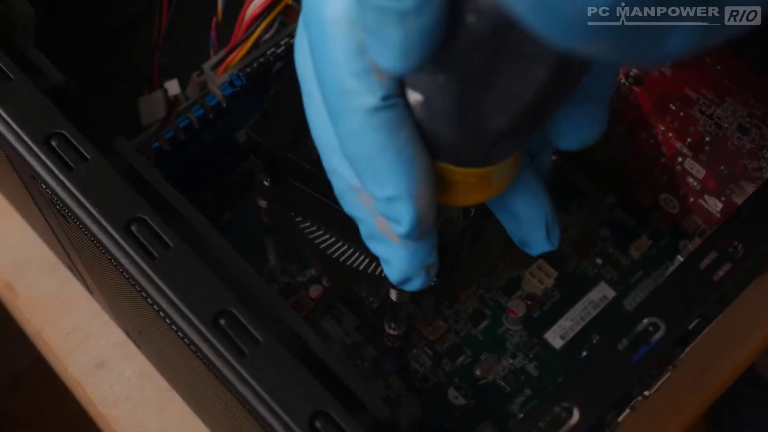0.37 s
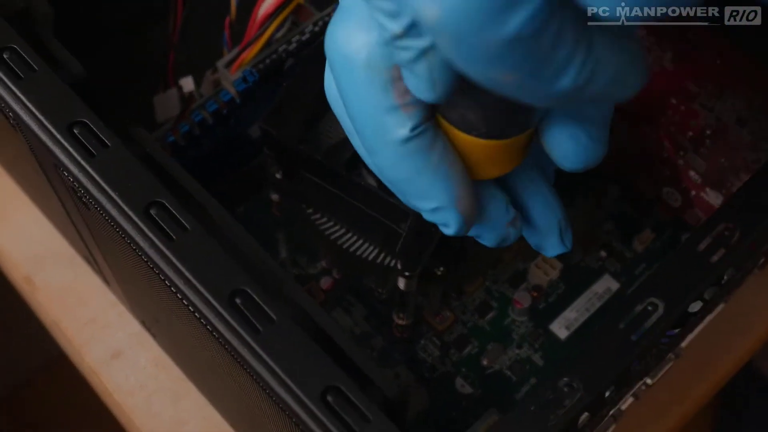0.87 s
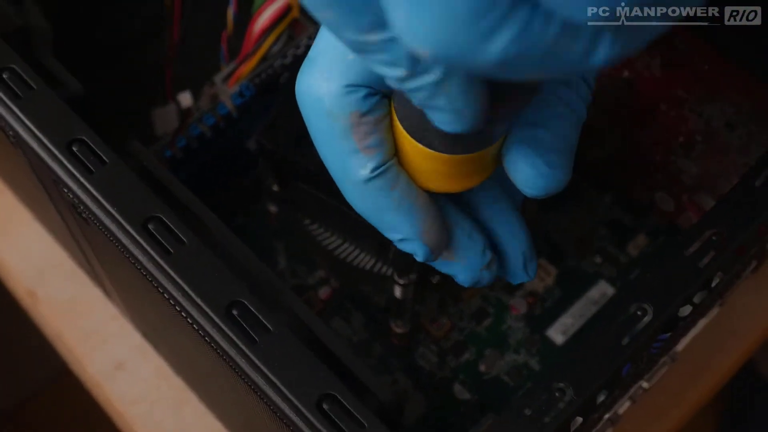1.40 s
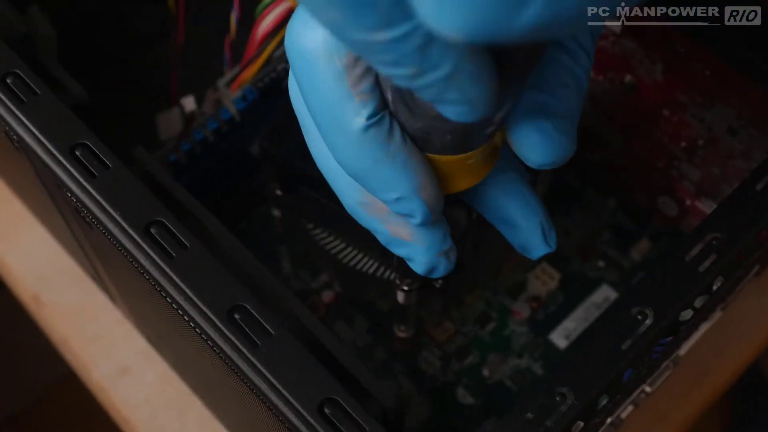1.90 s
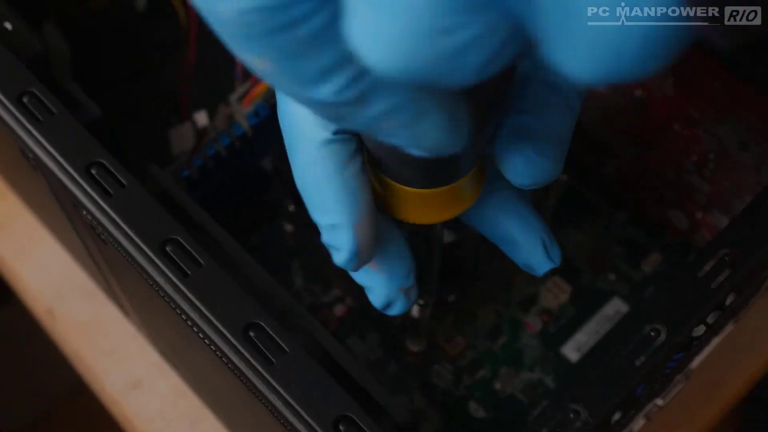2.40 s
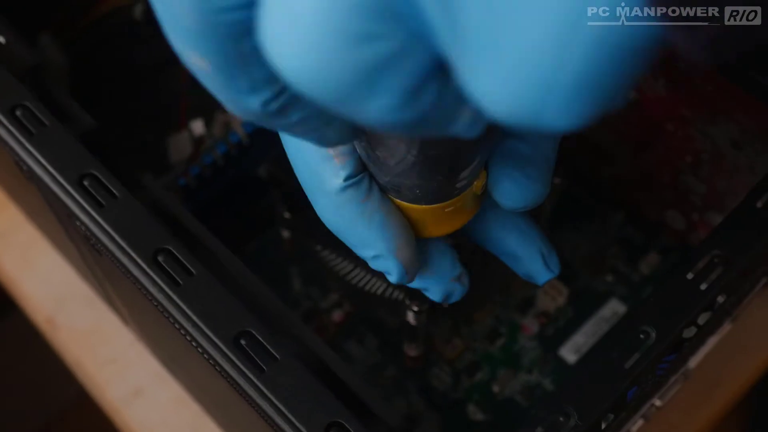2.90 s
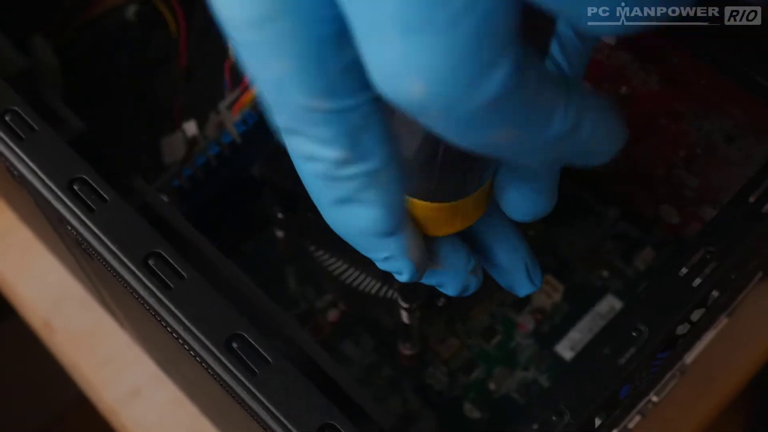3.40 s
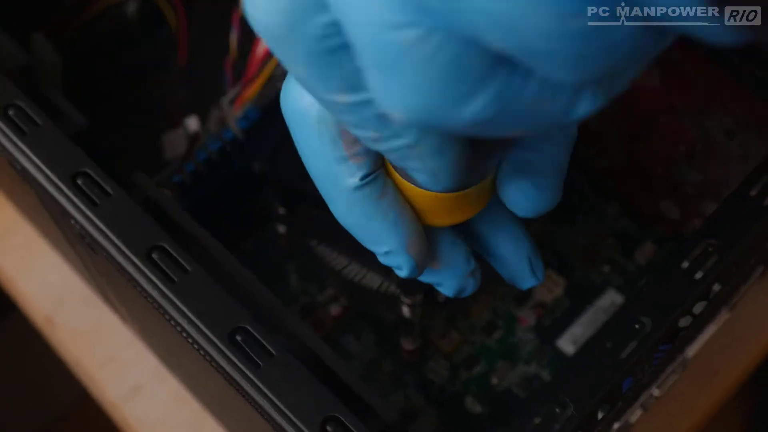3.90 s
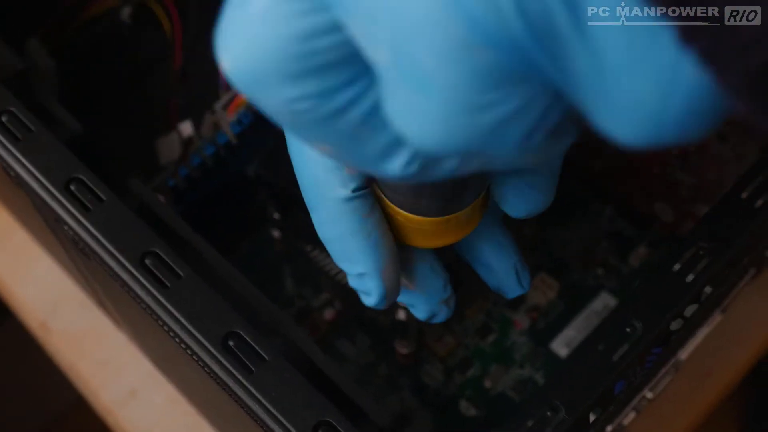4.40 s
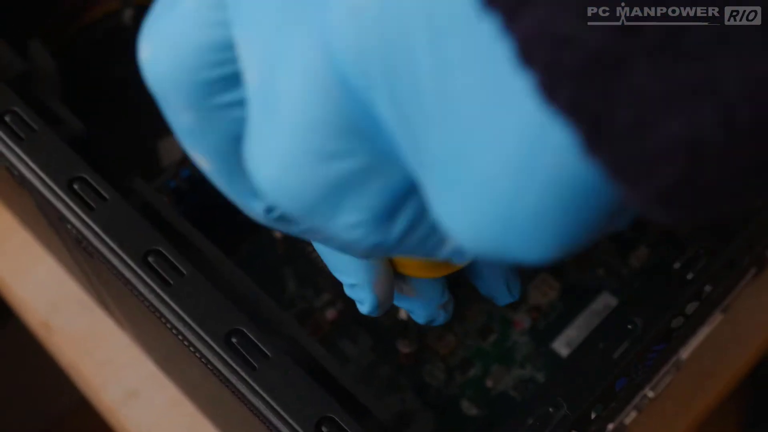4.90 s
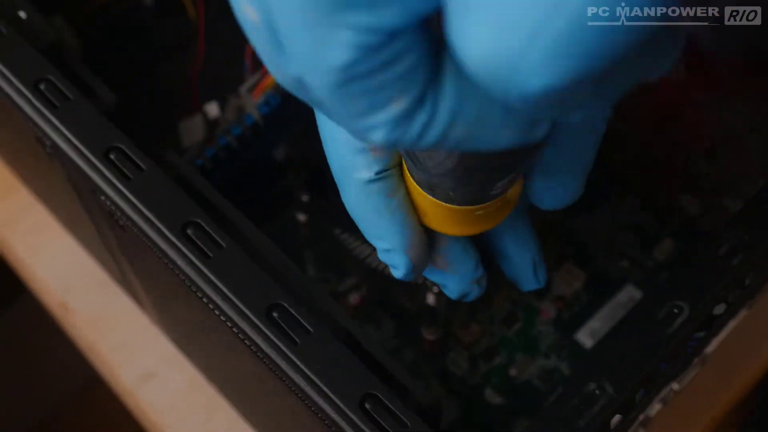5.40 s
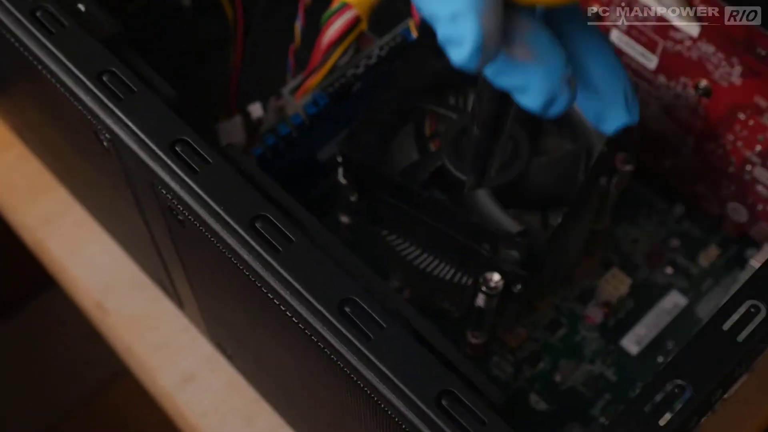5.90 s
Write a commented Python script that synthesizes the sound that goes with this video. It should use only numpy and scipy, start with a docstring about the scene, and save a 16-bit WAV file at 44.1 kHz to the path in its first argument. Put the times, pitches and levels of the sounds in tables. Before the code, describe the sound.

Gloved fingers rustle quickly around a screwdriver handle while small metal ticks, gritty scrapes and several hard, short clacks sound in a quiet room.

```python
"""A quiet room: gloved hands turn a screwdriver on a spring-loaded screw inside an open sheet-metal case.
The tip ticks and scrapes and the spring pings: clicks and grains set metal tones ringing.
Pushes thump by rocking the case panels; gloves rustle as swelling noise and once squeak as a gliding tone.
A low hum and a hiss lie below, and echoes of dying noise follow. Two microphones stand a little apart."""
import sys
import numpy as np
from scipy import signal
from scipy.io import wavfile

SR = 44100
rng = np.random.default_rng(int(sys.argv[2]) if len(sys.argv) > 2 else 0)


def makeup_ratio(level_db):
    """Linear amplitude ratio for a level in decibels (20 dB per factor of ten)."""
    decades = np.asarray(level_db, float) / 20
    return 10 ** decades


def inscribe(sig):
    """Save sig as 16-bit PCM at rate SR to the path in sys.argv[1].

    A 1-D sig is mono; a 2-D sig holds one channel per row.
    Samples are clipped to [-1, 1] before scaling.
    """
    pcm = np.round(np.clip(np.atleast_2d(sig).T, -1, 1) * 32767)
    wavfile.write(sys.argv[1], SR, pcm.astype(np.int16))


N = 266452   # length in samples

# ringing tones of the case panels: pitch_hz [Hz], level_db [relative dB], t60_s [s to fall by 60 dB]
CASE_MODES = [(134, 7, 0.19), (176, 3.5, 0.19), (231, 18.5, 0.053), (282.2, 5, 0.14), (319.5, -1, 0.31),
              (353.7, 8.5, 0.1), (401, 5, 0.087), (465, -10, 0.018), (557, -7.5, 0.017), (630, -26.5, 0.02),
              (930, -15.5, 0.02), (972, -13.5, 0.028), (1103, -6.5, 0.017), (1320, -6, 0.016),
              (1536, -10, 0.021), (2010, -10, 0.0082), (1103, -13.5, 0.0065)]


def rms_one(x):
    """Scales a sound to an rms of 1."""
    return x / np.sqrt(np.mean(x ** 2) + 1e-20)


def in_time(rows):
    """Draws straight lines between timed rows, one curve for each column after the time."""
    time_s, *columns = np.transpose(rows)
    return [np.interp(np.arange(N) / SR, time_s, column) for column in columns]


def at_hz(points, hz):
    """Reads a table of (Hz, value) at a pitch, between its points on a log pitch scale."""
    points_hz, values = np.transpose(points)
    return np.interp(np.log(hz), np.log(points_hz), values)


def drift(rate_hz):
    """Slow random wandering of rms 1: smoothed noise with one point every 40 samples."""
    r = np.exp(-80 * np.pi * rate_hz / SR)
    noise = rng.standard_normal(N // 40 + 2002)
    slow = signal.lfilter([1], [1, -2 * r, r * r], noise)[2000:]   # drop the start-up
    return np.interp(np.arange(N) / 40, np.arange(len(slow)), rms_one(slow))


def ring(force, hz, t60_s):
    """A resonance: a unit click sets a dying sine of starting height 1 ringing."""
    r = makeup_ratio(-60 / (t60_s * SR))
    w = 2 * np.pi * hz / SR
    return signal.lfilter([0, np.sin(w)], [1, -2 * r * np.cos(w), r * r], force + 1e-18)


def bandpass(x, low_hz, high_hz):
    """Keeps only the sound between two pitches."""
    return signal.sosfilt(signal.butter(2, [low_hz, high_hz], "band", fs=SR, output="sos"), x)


def highpass(x, order, hz):
    """Removes the sound below a pitch."""
    return signal.sosfilt(signal.butter(order, hz, "high", fs=SR, output="sos"), x)


def spread(pair, hz):
    """Mid and side to left and right, as alike as two spaced microphones are at this pitch."""
    # pitch_hz [Hz], likeness of left and right [0 to 1]
    likeness_points = [(60, 0.3), (150, 0.97), (380, 0.86), (950, 0.018), (2380, 0.012), (5980, 0.29),
                       (15000, 1)]
    alike = np.clip(at_hz(likeness_points, hz), -1, 1)
    mid, side = pair
    return np.sqrt(1 + alike) * mid + np.sqrt(1 - alike) * side * [[1], [-1]]


def banded_noise(spectrum, patchy_db):
    """Third-octave bands of stereo noise, flickering partly together and partly alone; rms 1."""
    out = 0
    together = drift(18.5)
    lowest_hz, highest_hz = spectrum[0][0], spectrum[-1][0]
    edges = lowest_hz * 2 ** np.arange(0, np.log2(highest_hz / lowest_hz) + .3, 1 / 3)
    white = rng.standard_normal((2, 2, N))   # neighbouring bands use different noise
    for k, (low, high) in enumerate(zip(edges, edges[1:])):
        pair = bandpass(white[k % 2], low, high)
        hz = np.sqrt(low * high)
        flicker_db = patchy_db * (2.6 * together + drift(23.0))
        out = out + makeup_ratio(at_hz(spectrum, hz) + flicker_db) * spread(pair, hz)
    return rms_one(out)


def swells(rows, rest_db, rise, fall):
    """Level in dB: each row swells and fades at set rates (dB per s) above a resting level."""
    t = np.arange(0, N + 64, 64) / SR
    power = makeup_ratio(2 * np.interp(t, np.arange(N) / SR, rest_db))
    for time_s, level_db, *_ in rows:
        below_peak_db = np.where(t < time_s, rise * (time_s - t), fall * (t - time_s))
        power = power + makeup_ratio(2 * (level_db - below_peak_db))
    return np.interp(np.arange(N) / SR, t, 10 * np.log10(power))


def struck(modes, starts_s, shapes, gains_db, uneven_db, steady):
    """Every contact drives every mode with a strength of its own; a steady rubbing force is added."""
    luck = rng.standard_normal((len(starts_s), len(modes)))
    out = 0
    for k, (hz, level_db, t60_s) in enumerate(modes):
        force = steady(hz)
        gains = makeup_ratio(gains_db(hz) + uneven_db * luck[:, k])
        for start_s, shape, gain in zip(starts_s, shapes, gains):
            i = round(start_s * SR)
            force[:, i:i + shape.shape[1]] += gain * shape[:, :N - i]
        sign = (-1) ** (k * (hz > 600))   # high modes alternate in sign
        tone = ring(force, hz, t60_s) * [[1], [.7]]   # less side: near sources are more alike
        out = out + makeup_ratio(level_db) * sign * spread(tone, hz)
    return out


def hum():
    """A wavering low tone: a steady sine plus noise sent twice through one narrow resonance."""
    # wavering of the hum: time_s [s], level_db [dB rms]
    hum_levels = [(0.0, -76), (0.74, -56), (2.39, -58.5), (2.94, -49), (4.04, -73), (4.37, -55.5),
                  (4.95, -56), (5.55, -65.5), (6.04, -58.5)]
    pitch_hz, width_hz = 118.7, 1.2
    t60_s = 2.2 / width_hz
    noise = rng.standard_normal(N + SR)
    tone = ring(ring(noise, pitch_hz, t60_s), pitch_hz, t60_s)[SR:]   # drop the start-up
    steady = np.sin(2 * np.pi * pitch_hz * np.arange(N) / SR)
    level_db, = in_time(hum_levels)
    return makeup_ratio(level_db) * rms_one(steady + .15 * rms_one(tone))


def room_hiss():
    """Room hiss: faintly flickering noise at -60 dB rms."""
    # colour of the hiss: pitch_hz [Hz], level_db [relative dB per Hz]
    hiss_spectrum = [(15, -35), (25, 3.5), (64, -4), (113, -1), (209, 5), (552, -5.5), (919, -7),
                     (1080, -5), (1900, -15), (8130, -26), (10600, -21.5), (12500, -39), (15500, -94)]
    return makeup_ratio(-60) * banded_noise(hiss_spectrum, patchy_db=0.35)


def room(x):
    """Dense echoes of case and walls: octave bands of dying noise."""
    # how long echoes last: pitch_hz [Hz], t60_s [s to fall by 60 dB]
    echo_times = [(500, 0.2), (1500, 0.15), (10000, 0.22)]
    wall_loss_db_per_octave = 2   # echoes come back duller
    t = np.arange(SR // 2) / SR
    echoes = 0
    for hz in 500 * 2 ** np.arange(5):
        pair = bandpass(rng.standard_normal((2, len(t))), hz / np.sqrt(2), hz * np.sqrt(2))
        t60_s = np.clip(at_hz(echo_times, hz), .02, 1)
        level_db = -60 * t / t60_s - wall_loss_db_per_octave * np.log2(hz / 500)
        echoes = echoes + spread(pair, hz) * makeup_ratio(level_db)
    echoes = echoes * np.minimum(t / 0.0046, 1)   # echoes build up over 4.6 ms
    echoes = echoes / np.sqrt(np.sum(echoes ** 2))
    return signal.fftconvolve(x.mean(axis=0)[None], echoes, axes=1)[:, :N]


def effort():
    """How hard the hands bear down on the tool, as a level in dB over time."""
    # time_s [s], level_db [relative dB]
    effort_levels = [(0.0, -57.5), (0.15, -55.5), (0.69, -58.5), (1.16, -65.5), (1.63, -61), (2.0, -61.5),
                     (2.34, -65), (3.04, -60), (3.41, -60.5), (3.99, -60), (4.39, -57.5), (4.74, -60),
                     (5.02, -83), (5.38, -69.5), (6.04, -79)]
    effort_db, = in_time(effort_levels)
    return effort_db


def glove_rustle(swing_db):
    """Gloves on the handle: noise swells as fingers slide to a new grip, and once with the big knock, and
    rustles on while they hold."""
    # colour of the rustle: pitch_hz [Hz], level_db [relative dB per Hz]
    glove_spectrum = [(1760, 2.5), (3000, 10.5), (3210, 7), (3440, 8.5), (5420, 6.5), (7960, 6.5),
                      (10900, 14), (14200, 1.5), (15500, -74)]
    # swells of the rustle, mostly fingers sliding round the handle; the one at 4.9 s rides on the big knock:
    # time_s [s], level_db [relative peak dB]
    rustle_swells = [(0.1, -64), (0.22, -62), (0.36, -61), (0.45, -59), (0.58, -61), (0.75, -58), (0.96, -67),
                     (1.16, -66), (1.25, -61), (1.51, -63), (1.75, -60), (1.99, -62), (2.18, -63),
                     (2.33, -63), (2.43, -58), (2.55, -61), (2.66, -65), (2.81, -59), (3.0, -63), (3.19, -57),
                     (3.39, -62), (3.53, -60), (3.7, -63), (3.94, -61), (4.05, -63), (4.17, -60), (4.43, -59),
                     (4.58, -63), (4.78, -64), (4.9, -60), (5.3, -72), (5.42, -72), (5.57, -69), (5.69, -60),
                     (5.98, -65)]
    # holding hands follow 0.8 of the effort's swing
    rustle_db = swells(rustle_swells, -70 + 0.8 * swing_db, rise=124, fall=142)
    return makeup_ratio(rustle_db + 4.0) * banded_noise(glove_spectrum, patchy_db=0.6)


def squeak():
    """Stick-slip of the glove on the rubber handle: a thin gliding tone blurred by fast chance."""
    # time_s [s], pitch_hz [Hz], level_db [relative dB]
    squeak_glide = [(.49, 6540, -110), (.512, 6250, -58), (.535, 6230, -42), (.55, 6300, -62),
                    (.61, 7600, -53), (.66, 8000, -70), (.68, 8000, -110)]
    hz, level_db = in_time(squeak_glide)
    blur = signal.lfilter([1], [1, -.93], rng.standard_normal((2, N)))
    return makeup_ratio(level_db) * rms_one(blur) * np.sin(2 * np.pi * np.cumsum(hz) / SR)


def pings():
    """The spring slips a coil: one hard click and a weaker dying crackle set it ringing."""
    # start_s [s], low_db, middle_db, high_db [ring in three pitch ranges, relative dB], rattle_ms [ms]
    spring_slips = [(0.153, -41, -46, -46, 3.8), (0.846, -35.5, -40, -43, 4.7),
                    (0.889, -18, -17.5, -98, 0.34), (1.493, -45.5, -45, -39.5, 9.2),
                    (2.792, -46, -41, -46, 2.2), (3.2334, -38.5, -57, -30.5, 7.5),
                    (3.573, -60, -58, -43, 1.8), (3.605, -47.5, -56, -49, 3.9),
                    (3.635, -63, -42.5, -36.5, 3.8), (4.714, -38.5, -39.5, -40, 6.1),
                    (5.176, -58, -53, -72, 3.2), (5.443, -50.5, -57, -64, 3.7)]
    # ringing tones of the spring: pitch_hz [Hz], level_db [relative dB], t60_s [s to fall by 60 dB]
    spring_modes = [(2600, 1.5, 0.008), (2760, -8.5, 0.03), (3100, -1.5, 0.0059), (3570, -3, 0.0062),
                    (4280, 0, 0.0075), (4660, -2, 0.0035), (5200, -6, 0.0057), (7630, -2, 0.0047),
                    (8110, -6, 0.0094), (13180, -7, 0.0066)]
    start_s, low_db, middle_db, high_db, rattle_ms = np.transpose(spring_slips)
    after = np.arange(900)   # samples since the slip
    lengths = np.clip(rattle_ms, .1, 9)[:, None, None] * SR / 1000
    crackle = rng.standard_normal((len(start_s), 2, len(after)))
    shapes = makeup_ratio(-7.5) * crackle * np.exp(-after / lengths)
    shapes[:, :, 0] = 1   # the hard click

    def ring_db(mode_hz):
        """Each pitch range of the spring has its own strength."""
        if mode_hz < 3250:
            return low_db - 9.0
        return (middle_db if mode_hz < 6000 else high_db) - 9.0
    return struck(spring_modes, start_s, shapes, ring_db, uneven_db=1.0,
                  steady=lambda mode_hz: np.zeros((2, N)))


def thumps(effort_db):
    """The pushed tool rocks briefly at the pitch of the spot it presses and rings the panels."""
    # pushes into the case: time_s [s], level_db [relative peak dB], pitch_hz [strongest ring, Hz]
    case_pushes = [(0.126, -33.5, 163), (0.362, -32, 197), (0.441, -16.5, 185), (0.719, -9.5, 248),
                   (1.601, -31.5, 226), (1.844, -35, 231), (1.958, -40, 229), (1.985, -35.5, 200),
                   (2.078, -36.5, 183), (2.265, -35.5, 234), (2.302, -36, 226), (2.532, -37, 432),
                   (2.685, -31, 210), (2.843, -31, 220), (3.032, -33.5, 166), (3.164, -39.5, 238),
                   (3.231, -38, 176), (3.361, -33.5, 179), (3.523, -32, 490), (3.547, -25.5, 457),
                   (3.568, -31.5, 210), (3.768, -29.5, 222), (3.921, -31.5, 456), (4.182, -28.5, 174),
                   (4.212, -29, 258), (3.992, -33.5, 240), (4.362, -37, 263), (4.758, -36.5, 217),
                   (4.8901, -9, 255), (5.27, -44.5, 231), (5.427, -41.5, 189), (5.691, -35, 380),
                   (5.742, -39.5, 224)]
    time_s, level_db, pitch_hz = np.transpose(case_pushes)
    shapes = []
    t = np.arange(SR // 10) / SR
    for rock_hz in pitch_hz:
        push = t ** 2 * np.exp(-t * rock_hz / 0.33) * np.sin(2 * np.pi * rock_hz * t)
        shapes.append(push / np.sum(abs(push)) * [[1], [0]])   # no side signal
    # the case shudders under the hand after each push; between pushes the rub follows the effort
    rub_db = swells(case_pushes, effort_db + 24, rise=2400, fall=175) - 61.5
    lumps_db = 4 * drift(18)
    rub = makeup_ratio(rub_db + lumps_db) * rng.standard_normal((2, N))

    def panel_db(mode_hz):
        """Panels far in pitch from the pressed spot ring less."""
        return level_db - 14.5 - 4 * np.log2(mode_hz / pitch_hz) ** 2
    # each push starts 4 ms ahead of its listed time
    return struck(CASE_MODES[:10], time_s - .004, shapes, panel_db, uneven_db=2.0,
                  steady=lambda mode_hz: rub.copy())


def thread_scrape(swing_db):
    """The thread creeps, breaks loose and grinds on: dense tiny clicks of uneven strength."""
    # time_s [s], level_db [relative peak dB]
    thread_skids = [(0.46, -48), (0.72, -48), (1.31, -50.5), (1.97, -50.5), (2.27, -55), (2.83, -52),
                    (3.4, -49), (3.52, -37), (3.78, -53.5), (3.93, -44), (4.22, -50), (4.35, -51.5),
                    (4.8, -44), (4.92, -39.5), (5.69, -52.5)]
    # creeping between skids follows 0.6 of the effort's swing
    scrape_db = swells(thread_skids, -62 + 0.6 * swing_db, rise=400, fall=192)
    clicks = rng.random(N) < 600 / SR   # 600 per second on average
    uneven_db = 3.4 * np.minimum(rng.exponential(1, N), 4) + 3.0 * drift(34)
    grains = clicks * makeup_ratio(uneven_db)
    return makeup_ratio(scrape_db) * rms_one(grains * rng.standard_normal((2, N)))


def ticks(scrape):
    """Each contact is a dying rattle of clicks that rings panels and steel; the scrape rings them too."""
    # tip, thread and spring contacts: start_s [s], level_db [peak], panel_db [panel ring],
    # treble_db [treble ring; all three relative dB], rattle_ms [ms]
    metal_contacts = [(0.1228, -67, -52, -52, 4.3), (0.152, -46.5, -50.5, -104, 11),
                      (0.4355, -22.5, -22, -30.5, 5.5), (0.622, -78, -46.5, -46, 4.9),
                      (0.7137, -22, -20, -20, 5.6), (1.177, -47.5, -60, -57, 5), (1.307, -81, -51, -79, 20),
                      (1.728, -51, -92, -43.5, 2.4), (1.837, -53, -50, -71, 1.8),
                      (1.9835, -46.5, -59, -52, 3.2), (2.0738, -52, -55, -66, 7.2),
                      (2.178, -57, -81, -61, 2.1), (2.19, -47.5, -55, -43.5, 4.7),
                      (2.305, -58, -56, -57, 4.9), (2.367, -54, -58, -62, 2.3), (2.383, -53, -60, -45, 3),
                      (2.5232, -43.5, -46.5, -38, 9), (2.603, -48, -56, -43, 2.4),
                      (2.8267, -57, -57, -38, 3.1), (2.845, -46, -68, -44, 4.4), (2.9178, -66, -50, -64, 3),
                      (3.0173, -54, -47.5, -41, 4.7), (3.0887, -42.5, -49, -43, 3.8),
                      (3.166, -40.5, -55, -53, 16), (3.3717, -42.5, -49.5, -44, 7.5),
                      (3.4187, -45.5, -49, -45, 1.9), (3.5122, -29.5, -29, -33.5, 4.2),
                      (3.519, -40, -29.5, -41, 11), (3.63, -41.5, -50.5, -43, 8.1),
                      (3.756, -75, -41.5, -72, 12.6), (3.7648, -42.5, -67, -39, 5.4),
                      (3.9049, -39, -35.5, -43, 11.6), (3.9903, -43, -48.5, -43, 6.9),
                      (4.1683, -42.5, -45.5, -38, 2), (4.202, -40.5, -40.5, -44, 11.7),
                      (4.331, -49, -44.5, -77, 17), (4.408, -46, -58, -34.5, 18),
                      (4.4687, -42.5, -60, -94, 9.1), (4.6309, -49, -56, -43, 6.7),
                      (4.8355, -34.5, -39, -29, 5.4), (4.885, -21, -15.5, -16.5, 3.9),
                      (5.281, -55, -87, -50, 1.6), (4.872, -38, -43, -64, 8.5),
                      (5.588, -49, -54.5, -57, 7.7), (5.659, -44, -47.5, -37, 10.3),
                      (5.6889, -48, -52, -38, 9.7), (5.865, -67, -88, -49, 0.5),
                      (5.9772, -60, -60, -44.5, 4.1)]
    # tones of screw, spring and steel shaft: pitch_hz [Hz], level_db [relative dB], t60_s [s to fall 60 dB]
    screw_modes = [(2320, 1, 0.018), (2720, 10, 0.01), (3480, 6.5, 0.0052), (4180, 12, 0.0087),
                   (4470, 27, 0.0007), (5140, 13, 0.01), (6560, 1.5, 0.01), (9140, -13, 0.013),
                   (10520, -7, 0.015), (11540, -9.5, 0.0044), (13600, -18, 0.0034), (8100, 12.5, 0.00029)]
    start_s, level_db, panel_db, treble_db, rattle_ms = np.transpose(metal_contacts)
    after = np.arange(3000)   # samples since the contact
    uneven_db = 2.2 * rng.exponential(1, (len(start_s), 1, len(after)))
    clicks = rng.standard_normal((len(start_s), 2, len(after))) * makeup_ratio(uneven_db)
    lengths = np.clip(rattle_ms, .1, 30)[:, None, None] * SR / 1000
    dying = np.exp(-(after / (1.94 * lengths)) ** 2.0)
    soft_start = 1 - np.exp(-(after + 1) / (0.17 * lengths))   # slower for long rattles
    shapes = clicks * dying * soft_start
    # contacts under 9 ms open with one hard click, 0.36 of the whole rattle's strength
    shapes[:, :, 20] += 0.36 * np.sqrt(np.sum(shapes ** 2, axis=2)) * (rattle_ms[:, None] < 9)
    shapes = shapes / np.sqrt(np.sum(shapes ** 2, axis=2, keepdims=True))

    def panel_ring_db(mode_hz):
        """Longer rattles shake the low panel modes more: 4.5 dB per doubling."""
        return panel_db + 10.5 + (mode_hz < 900) * (4.5 * np.log2(rattle_ms / 5) - 1.5)
    panels = struck(CASE_MODES[7:], start_s, shapes, panel_ring_db, uneven_db=0.0,
                    steady=lambda mode_hz: makeup_ratio(-20.0) * scrape)

    # light contacts that spare the panels ring the steel higher: 0.018 octave per dB
    centre_hz = 2450 * 2 ** (.018 * np.clip(level_db - panel_db, 0, 30))

    def steel_db(mode_hz):
        """Shaft and spring ring most near their centre; the treble has its own strength."""
        if mode_hz > 7000:
            return treble_db - 2.0
        return level_db - 9.5 - 10.5 * np.log2(mode_hz / centre_hz) ** 2
    steel = struck(screw_modes, start_s, shapes, steel_db, uneven_db=1.0,
                   steady=lambda mode_hz: makeup_ratio(-38.5 - 6.6 * np.log2(mode_hz / 3000)) * scrape)

    # each click of a rattle is also heard bare, as broad grit
    grit = np.zeros((2, N + len(after)))
    for start, shape, gain in zip(np.round(start_s * SR).astype(int), shapes, makeup_ratio(level_db + 2)):
        grit[:, start:start + len(after)] += gain * shape
    low_hz, high_hz = 1700, 6000
    grit = bandpass(grit[:, :N], low_hz, high_hz)
    return panels + steel + spread(grit * [[1], [.7]], low_hz)


def two_microphones(near):
    """Places the work between two microphones: treble leans left, bass is alike, the left hears later."""
    treble = highpass(near, 1, 700)
    near = near + 0.067 * treble * [[1], [-1]]
    side = highpass(near[0] - near[1], 2, 650) / 2   # below 650 Hz both hear the same
    left, right = near.mean(axis=0) + side * [[1], [-1]]
    lag_samples = 1.1e-5 * SR   # 11 microseconds
    lag = (1 - lag_samples) / (1 + lag_samples)   # an allpass delays by part of a sample
    left = signal.lfilter([lag, 1], [1, lag], left)
    return np.array([left, right])


def scene():
    """Mixes the hands' work with its echoes, then adds the hiss and hum of the room."""
    effort_db = effort()
    swing_db = effort_db - effort_db.mean()
    work = thumps(effort_db) + ticks(thread_scrape(swing_db)) + squeak()
    work = highpass(work, 4, 110)   # a small case radiates no deep bass
    spring = pings()
    echoes = makeup_ratio(-9.5) * room(work + .3 * spring)   # the small spring stirs case and room less
    near = work + spring + echoes + glove_rustle(swing_db)
    return two_microphones(near) + room_hiss() + hum()


def band_limit(x):
    """A steep low-pass at the top of the band."""
    return signal.sosfilt(signal.butter(12, 16470, fs=SR, output="sos"), x)


def record(dry):
    """The microphone housing has a narrow dip near 8 kHz; the top is cut."""
    dry = signal.sosfilt(signal.butter(8, 15700, fs=SR, output="sos"), dry)
    dip = signal.lfilter(*signal.iirpeak(7900, 70, fs=SR), dry)
    mix = dry - 1.1 * dip
    return band_limit(mix)


dry = scene()
out = record(dry)
inscribe(out)
```